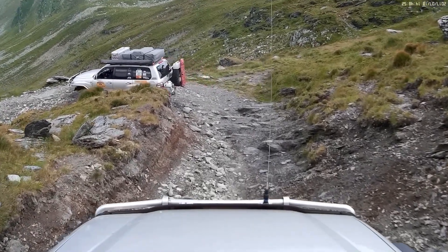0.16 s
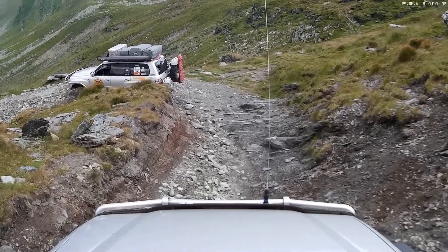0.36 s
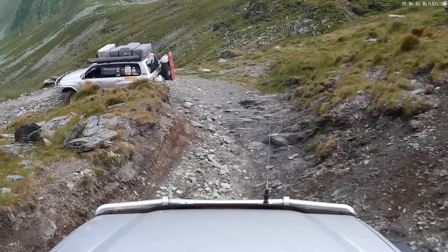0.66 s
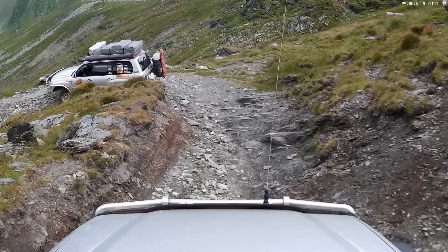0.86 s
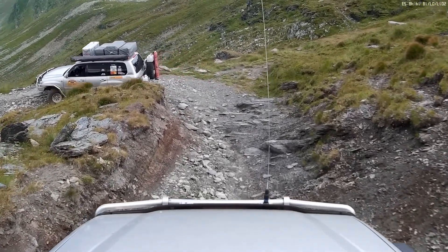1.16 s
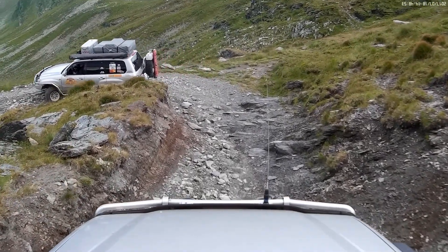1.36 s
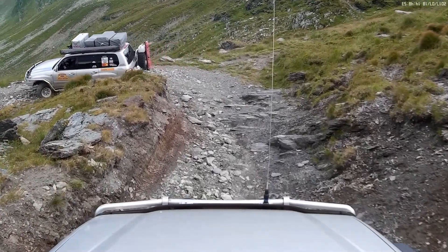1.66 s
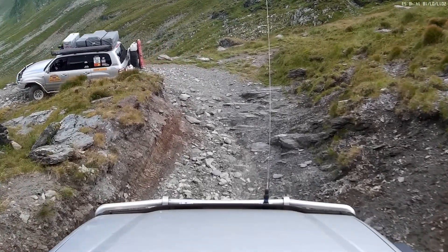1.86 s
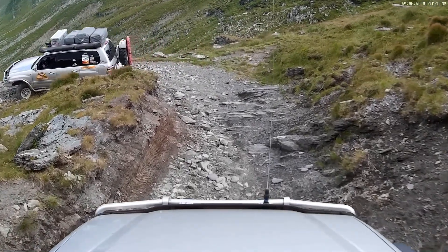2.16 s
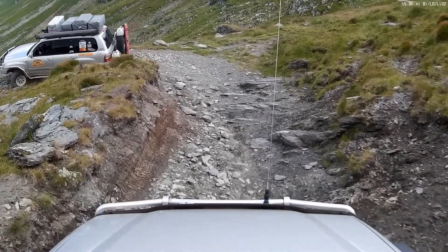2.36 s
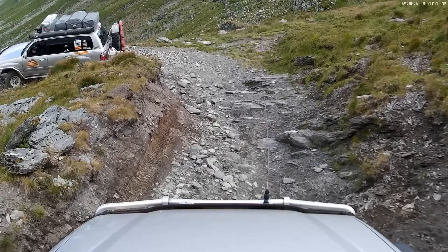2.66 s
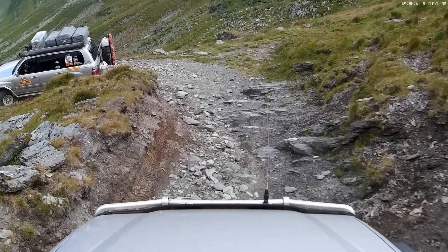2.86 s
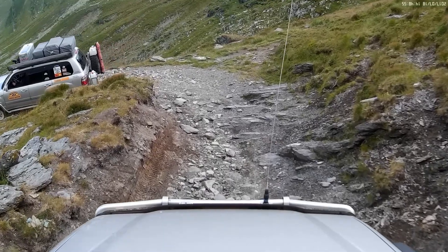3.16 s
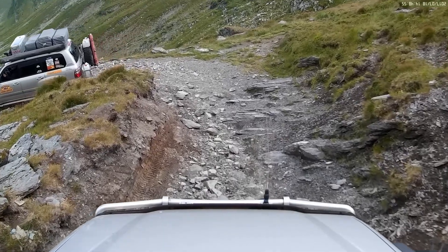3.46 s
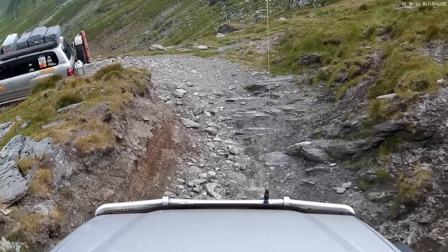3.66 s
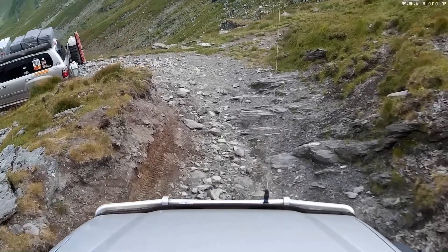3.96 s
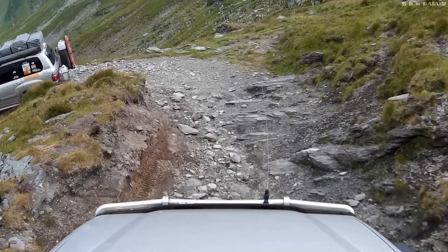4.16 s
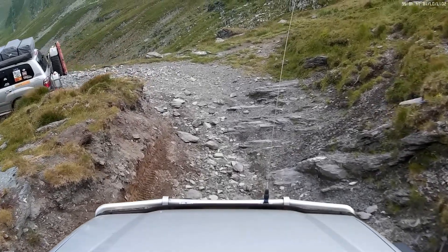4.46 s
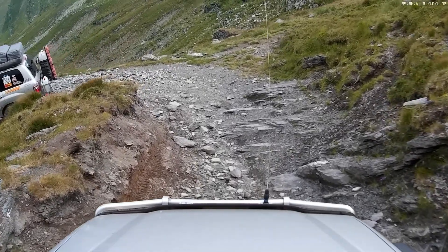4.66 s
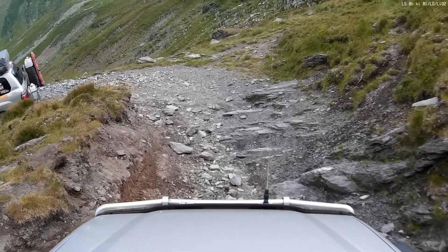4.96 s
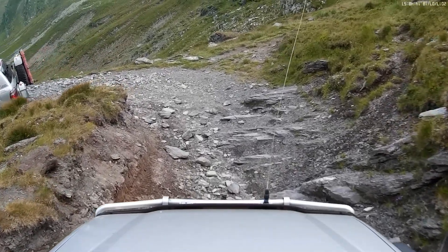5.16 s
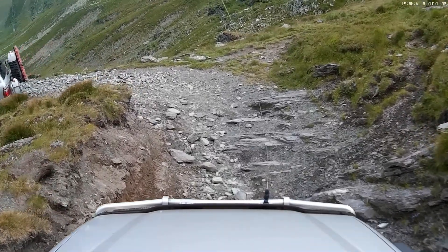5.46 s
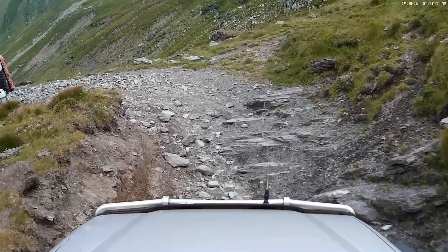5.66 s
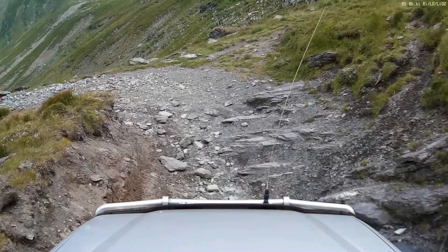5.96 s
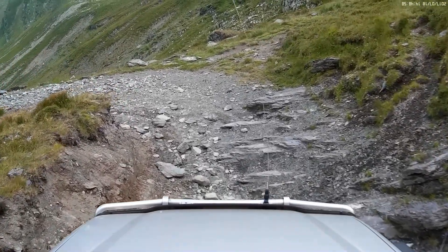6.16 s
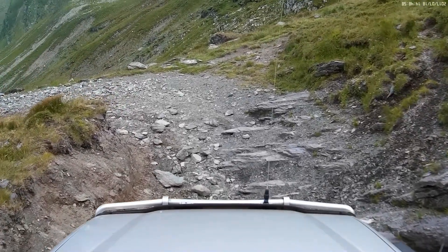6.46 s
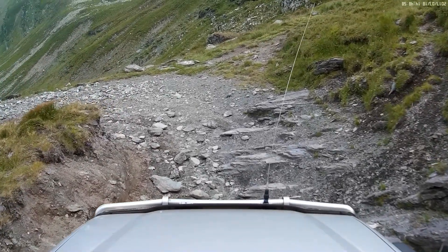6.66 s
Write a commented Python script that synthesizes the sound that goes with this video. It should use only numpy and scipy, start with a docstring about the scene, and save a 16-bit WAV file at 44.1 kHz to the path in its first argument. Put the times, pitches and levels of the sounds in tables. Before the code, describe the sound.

A low engine hum and stony tyre rumble inside a slowly crawling off-road vehicle, loose fittings clacking, with one hard bang and scrape midway.

```python
"""A low engine hum, tyre rumble and clacking cabin fittings: a four-wheel drive crawls over a rocky track,
heard from behind its windscreen. Engine orders make the hum; shaped noise and small knocks make the stony track.
Rocks thud as damped sines; fittings clack as noise bursts through resonances. One big lurch bangs a fitting
and grinds on stone. Trim squeaks as short rough tones of unsteady pitch, a brake sings thinly, high hiss
swishes by, and the camera's lens motor whines faintly as a train of filtered ticks over a steady hiss."""
import sys
import numpy as np
from scipy import signal
from scipy.fft import rfft, irfft, next_fast_len
from scipy.io import wavfile
from scipy.ndimage import map_coordinates

SR = 44100
rng = np.random.default_rng(int(sys.argv[2]) if len(sys.argv) > 2 else 0)


def master_out(mix):
    """Clip the mix to full scale and print it as 16-bit PCM to the path in sys.argv[1]."""
    frames = np.transpose(np.atleast_2d(mix))
    ceiling = np.clip(frames, -1, 1)
    pcm = np.round(ceiling * 32767).astype(np.int16)
    wavfile.write(sys.argv[1], SR, pcm)


N = 299880  # length in samples


def amp(db):
    """Decibels to gain."""
    return 10 ** (np.asarray(db) / 20)


def unit(x):
    """Scale to rms 1."""
    return x / np.sqrt(np.mean(x ** 2) + 1e-20)


def curves(rows):
    """One value per sample for each column after the time."""
    s, *columns = np.transpose(rows)
    return [np.interp(np.arange(N) / SR, s, column) for column in columns]


def wobble(rate, size=N):
    """A smooth random curve, rate knots a second."""
    knots = rng.standard_normal(size // 32)
    return map_coordinates(knots, [np.arange(size) * rate / SR], mode="wrap")


def add(track, s, sound):
    """Mix a sound into a track at time s."""
    part = track[max(round(s * SR), 0):][:len(sound)]
    part += sound[:len(part)]


def filtered(x, response):
    """Filter x by a complex response of frequency."""
    m = 2 * next_fast_len(N // 2 + SR // 4)
    return irfft(rfft(x, m) * response(np.fft.rfftfreq(m, 1 / SR)), m)[:N]


def coloured(x, points):
    """Causal filter of unit power gain through (f/Hz, level/dB) points."""
    def response(hz):
        f, db = np.transpose(points)
        gain = unit(amp(np.interp(np.log(hz + 1), np.log(f), db)))
        # folding the cepstrum forward gives minimum phase: nothing sounds before the input
        cepstrum = irfft(np.log(gain))
        cepstrum[1:len(hz) - 1] *= 2
        cepstrum[len(hz):] = 0
        return np.exp(rfft(cepstrum))
    return filtered(x, response)


def resonate(x, modes):
    """Causal bank of resonances of unit power gain, each falling off steeply above its pitch."""
    def response(f):
        h = 0
        for c, width, db in modes:
            band = 1j * f * width / (c * c - f * f + 1j * f * width)
            h = h + amp(db) * band / (1 + 1j * f / c) ** 2
        return h / np.sqrt(np.mean(abs(h) ** 2))
    return filtered(x, response)


def noise(points):
    """Coloured noise of rms 1."""
    return unit(coloured(rng.standard_normal(N), points))


def burst(attack, t60):
    """A scatter of cabin reflections that builds up and dies away."""
    t = np.arange(SR // 5) / SR
    decay = np.exp(-np.log(1000) * t / t60)
    return rng.standard_normal(len(t)) * (1 - np.exp(-t / attack)) * decay


# relative spectrum of the cabin hiss: f/Hz, level/dB
AIR_COLOUR = [(1900, -10), (3300, 4.5), (3800, -6), (5050, -0.5), (5800, -9), (10200, -14), (15500, -28)]


def air():
    """A faint, steady hiss fills the cabin."""
    drift_db = 1.2 * wobble(6)
    return noise(AIR_COLOUR) * amp(-63.0 + drift_db)


# short runs of the lens motor: t/s, length/s, step rate f/Hz, level/dB
LENS_RUNS = [(0.25, 0.23, 1411.5, -68), (3.49, 0.04, 790, -61), (4.29, 0.12, 1411.5, -73),
             (5.45, 0.6, 170, -72), (6.41, 0.08, 1411.5, -73), (6.49, 0.042, 790, -65)]
# how the lens barrel passes the steps on: f/Hz, relative level/dB
LENS_BARREL = [(5000, -26), (8600, -9), (10100, 2), (11200, -2), (12900, -12), (14150, -6), (15000, -26)]
HUNT_HZ = 140  # at or below this step rate the motor stumbles most


def lens_motor():
    """Each motor step ticks the lens barrel: slow runs stumble and rustle, fast ones whine thinly."""
    out = np.zeros(N)
    barrel = coloured(signal.unit_impulse(N), LENS_BARREL)[:SR // 100]
    for s, length, hz, db in LENS_RUNS:
        stumble = min(HUNT_HZ / hz, 1) ** 3 * wobble(300, size=SR)[:int(length * SR)]
        rate = hz * np.exp(stumble)
        steps = np.cumsum(rate) / SR
        offset = (steps % 1 - .5) * SR / rate  # samples from the nearest step
        size = amp(2.5 * rng.standard_normal(SR))[steps.astype(int)]
        impulses = size * np.sinc(offset) * np.sin(np.pi * steps) ** 2
        ticks = signal.fftconvolve(impulses, barrel)[:len(steps)]
        add(out, s, amp(db) * unit(ticks) * signal.windows.tukey(len(steps), .2))
    return out


# a faint high rub comes round about once a turn of the wheels: start t/s
SWISH_STARTS = [1.26, 2.24, 3.26, 4.39, 5.27, 6.25]
SWISH_S = 0.28  # length of one rub


def swishes():
    """Soft, slightly grainy swells of narrow high hiss."""
    swell = np.zeros(N)
    for s in SWISH_STARTS:
        add(swell, s, signal.windows.tukey(int(SWISH_S * SR), .5))
    hiss = noise([(9100, -17), (10100, -8), (11200, -23)])
    return amp(-66.0 + 1.59 * wobble(60)) * swell * hiss


# path of a faint brake squeal, before its flutter: t/s, f/Hz, level/dB
BRAKE_SQUEAL = [(4.48, 6060, -71), (4.56, 6095, -54), (4.72, 6130, -64), (4.98, 5990, -60),
                (5.05, 6020, -73)]


def brake():
    """A rubbing brake sings one thin tone for a moment, its pitch and level fluttering."""
    hz, db = curves(BRAKE_SQUEAL)
    t = np.arange(N) / SR
    rubbing = (t > BRAKE_SQUEAL[0][0]) & (t < BRAKE_SQUEAL[-1][0])
    phase = 2 * np.pi * np.cumsum(hz * (1 + 0.003 * wobble(300))) / SR
    flutter_db = 2 * wobble(35) + 2.5 * wobble(150)
    return rubbing * amp(db + flutter_db) * np.sin(phase)


# stick-slip chirps of rubbing trim: t/s, length/s, centre f/Hz, level/dB
TRIM_SQUEAKS = [(0.318, 0.13, 3414, -46.5), (2.863, 0.039, 3420, -36.5), (2.913, 0.023, 7600, -44),
                (2.936, 0.022, 3470, -38), (2.962, 0.019, 7600, -46), (2.966, 0.0248, 3480, -40),
                (3.086, 0.03, 3280, -42.5), (3.122, 0.064, 6150, -63)]
SQUEAK_ROUGH_S = 0.035


def squeaks():
    """Rubbing trim catches and slips: squeaks up to SQUEAK_ROUGH_S rasp most, longer ones are steadier."""
    out = np.zeros(N)
    for s, length, hz, db in TRIM_SQUEAKS:
        n = int(length * SR)
        rough = min(SQUEAK_ROUGH_S / length, 1) ** 2
        pitch = hz + 130 * rough * wobble(900, size=SR)[:n]
        grip = amp(6 * rough * wobble(420, size=SR)[:n])
        tone = unit(grip * np.sin(2 * np.pi * np.cumsum(pitch) / SR))
        add(out, s, amp(db) * signal.windows.tukey(n, .5) * tone)
    return out


# how hard the tyres work over the stones: t/s, effort level/dB
TYRE_EFFORT = [(0, 0.5), (0.47, 6), (1, 1), (2.5, 0.5), (3.05, 4.5), (3.7, 0.5), (6.8, 1)]


def effort():
    """Effort of the tyres in dB; it lifts the rumble, the tyre noise and the engine's whirr."""
    return curves(TYRE_EFFORT)[0]


# engine speed before its small wander: t/s, firing rate f/Hz
FIRING_RATE = [(0, 31.17), (0.65, 32.45), (1.1, 31.24), (2.2, 35.14), (3.3, 33.58), (4.8, 34.9),
               (5.4, 33.02), (6.8, 33.75)]
# the cabin booms when the engine labours and drones when it runs freer:
# f/Hz of an engine order, its level/dB before the slow fade and waver
CABIN_BOOM = [(31, -44), (35, -63.5), (63, -48.5), (70, -58.5), (94, -55.5), (106, -67), (128, -62),
              (139, -52), (160, -55.5)]
# relative spectrum of the engine's whirr: f/Hz, level/dB
WHIRR_COLOUR = [(850, -18), (1100, -6), (1250, 3.5), (1430, -5), (1820, -6.5), (2200, -23.5), (5000, -40.5)]
HUM_FADE_DB_PER_S = 0.74  # the hum eases along the track
WHIRR_DB, WHIRR_GROWS = -50.5, 1.43  # level at an effort of 0 dB; dB per dB of effort


def engine():
    """Each firing of the slow-running engine sends a low pulse through the cabin and makes its whirr throb."""
    hz, = curves(FIRING_RATE)
    phase = 2 * np.pi * np.cumsum(hz * (1 + 0.0055 * wobble(18))) / SR
    fade_db = HUM_FADE_DB_PER_S * np.arange(N) / SR
    hum = np.zeros(N)
    for order in range(1, 6):
        db = np.interp(order * hz, *np.transpose(CABIN_BOOM)) - fade_db
        waver = amp(2 * wobble(8))
        hum += np.sqrt(2) * amp(db) * waver * np.cos(order * phase)
    throb = 1 + 0.38 * np.sin(phase)
    whirr_db = WHIRR_DB + WHIRR_GROWS * effort() + 1.64 * wobble(21)
    return hum + noise(WHIRR_COLOUR) * throb * amp(whirr_db)


# the vehicle drops off one big rock: the lurch builds up, peaks and settles
LURCH_S, LURCH_RISE_S, LURCH_FALL_S = 2.874, 0.34, 0.15


def lurch():
    """Depth of the big lurch, 0 to 1."""
    return curves([(LURCH_S - LURCH_RISE_S, 0), (LURCH_S, 1), (LURCH_S + LURCH_FALL_S, 0)])[0]


# relative spectrum of the body's rumble: f/Hz, level/dB
RUMBLE_COLOUR = [(15, -3), (25, 4.5), (35, 5.5), (65, -7.5), (100, 1), (150, -19), (300, -83)]
# relative spectrum of the tyres on loose stones: f/Hz, level/dB
TYRE_COLOUR = [(60, -28), (130, 1), (270, 2), (480, 0), (680, -11), (1000, -4.5), (2000, -49)]
RUMBLE_DB, TYRE_DB = -50, -49  # at an effort of 0 dB, away from the lurch
RUMBLE_GROWS = 0.82  # dB per dB of effort
LURCH_RUMBLE_DB, LURCH_TYRE_DB = 19, 12.5  # added at the lurch's peak


def track():
    """The body sways and rumbles while the tyres grind over loose stones: two bands of shaped noise."""
    effort_db, depth = effort(), lurch()
    rumble_db = RUMBLE_DB + RUMBLE_GROWS * effort_db + LURCH_RUMBLE_DB * depth
    tyre_db = TYRE_DB + effort_db + LURCH_TYRE_DB * depth + 1.03 * wobble(30)
    return noise(RUMBLE_COLOUR) * amp(rumble_db) + noise(TYRE_COLOUR) * amp(tyre_db)


# typical level at an effort of 0 dB, typical pitch, decay time
PEBBLES_PER_S, PEBBLE_DB, PEBBLE_HZ, PEBBLE_T60_S = 26, -44, 499, 0.031


def pebbles():
    """Small stones knock dully under the tyres as damped sines, harder where the tyres work harder."""
    t = np.arange(SR // 16) / SR
    out = np.zeros(N)
    draws = rng.standard_normal((int(PEBBLES_PER_S * N / SR), 3))
    for k, (when, size, pitch) in enumerate(draws):
        s = (k + when) / PEBBLES_PER_S
        db = PEBBLE_DB + np.interp(s, *np.transpose(TYRE_EFFORT)) + 4.5 * min(size, 2)
        hz = PEBBLE_HZ * np.exp(0.45 * pitch)
        swell = (1 - np.exp(-t / 0.0011)) * amp(db - 60 * t / PEBBLE_T60_S)
        add(out, s, swell * np.sin(2 * np.pi * hz * t))
    return out


# relative spectrum of stone scraping: f/Hz, level/dB
GRIND_COLOUR = [(300, 4), (1000, -9), (1750, 4.5), (2400, -8), (3450, 6), (5800, -31), (7200, -11),
                (8800, -25), (15500, -34)]
GRIND_DB, GRIND_HOLD_S, GRIND_FALL_DB_PER_S, GRITS_PER_S = -34.5, 0.024, 67, 260


def grind():
    """From the lurch's peak on, stone scrapes in a dense run of gritty catches that dies away."""
    t = np.arange(N) / SR - LURCH_S
    grits = (rng.random(N) < GRITS_PER_S / SR) * rng.standard_normal(N)
    scattered = signal.fftconvolve(grits, burst(attack=0.00071, t60=0.073))[:N]
    crunch = unit(coloured(scattered, GRIND_COLOUR))
    fall_db = GRIND_FALL_DB_PER_S * np.maximum(t - GRIND_HOLD_S, 0)
    return (t > 0) * crunch * amp(GRIND_DB + 3 * wobble(70) - fall_db)


# rocks under the floor: t/s, strength as a level/dB, f/Hz
ROCK_THUDS = [(0.476, -24, 238), (0.528, -15.5, 304), (1.103, -15.5, 235), (1.463, -25.5, 550),
              (2.122, -26, 473), (2.717, -24, 262), (3.166, -12.5, 298), (4.062, -23.5, 400),
              (4.16, -23.5, 520), (4.31, -22.5, 577)]
THUD_ATTACK_S, THUD_T60_S, PUSH_DB = 0.0021, 0.02, 5  # the floor is heavily damped


def thuds():
    """A rock gives the floor one short round push, and the panels shudder after it."""
    t = np.arange(SR // 6) / SR
    swell = (1 - np.exp(-t / THUD_ATTACK_S)) * amp(-60 * t / THUD_T60_S)
    push, shudder = np.zeros((2, N))
    for s, db, hz in ROCK_THUDS:
        give_db = PUSH_DB + 0.53 * (db + 16)  # the floor gives more under a heavy blow
        add(push, s, amp(db + give_db) * np.sin(2 * np.pi * hz * t) * swell)
        add(shudder, s, amp(db - 7) * burst(attack=0.003, t60=0.093))
    return push + coloured(shudder, [(70, -5.5), (200, -2.5), (450, 0), (800, -13.5), (3500, -52)])


MODE_SPREAD = 0.006  # the fittings ring a little higher or lower at each contact


def detuned(ring):
    """The same ring, shifted slightly in pitch by chance."""
    n = np.arange(len(ring))
    return map_coordinates(ring, [n * (1 + MODE_SPREAD * rng.standard_normal())])


# loose fittings strike and fall back, mostly in pairs: t/s, click level/dB, ring level/dB
FITTING_CLACKS = [(0.048, -54, -40), (0.076, -51, -42.5), (0.163, -52, -41.5), (0.226, -54.5, -41),
                  (0.257, -39.5, -29), (0.322, -40.5, -31), (0.462, -49.5, -39), (0.505, -51.5, -40),
                  (0.603, -41, -30.5), (0.65, -45, -33), (0.812, -54.5, -44), (1.051, -56.5, -46.5),
                  (1.134, -50, -40.5), (1.201, -51.5, -40), (1.235, -42.5, -31), (1.494, -59, -44.5),
                  (1.631, -50.5, -40), (1.814, -54, -40.5), (1.871, -56.5, -45.5), (1.942, -57, -48),
                  (2.308, -54.5, -44.5), (2.469, -48, -37.5), (2.573, -47, -34.5), (2.65, -47.5, -36.5),
                  (2.751, -44, -31.5), (2.777, -43.5, -26.5), (2.807, -33, -21), (2.894, -43, -30),
                  (2.975, -46.5, -29.5), (3.034, -45, -32.5), (3.114, -49.5, -34.5), (3.188, -41, -35),
                  (3.244, -41.5, -30.5), (3.349, -43, -29.5), (3.468, -43.5, -33), (3.498, -47.5, -36),
                  (3.686, -54.5, -44.5), (3.946, -50.5, -37.5), (4.076, -51, -41), (4.273, -49, -38),
                  (4.325, -49, -40.5), (4.639, -51, -41.5), (4.681, -55.5, -44), (4.784, -53.5, -41.5),
                  (4.83, -48.5, -36), (4.858, -48, -35.5), (4.885, -49, -35.5), (4.948, -51, -40.5),
                  (4.983, -56, -42), (5.209, -51, -39), (5.265, -52.5, -41.5), (5.306, -50.5, -40),
                  (5.427, -44.5, -34), (5.769, -55, -42.5), (5.83, -54, -42.5), (5.907, -51, -38),
                  (5.929, -47, -36.5), (5.96, -45.5, -37.5), (6.264, -50.5, -38.5), (6.338, -49, -39),
                  (6.413, -54, -41)]
# resonances in the hollow ring: f/Hz, width/Hz, relative level/dB
RING_MODES = [(433.2, 8, 12), (1026, 4.3, 13), (1273, 4.2, 15), (1389, 18, 9.5), (1548, 8.5, 12),
              (1647, 7.1, 16.5), (1746.6, 11.8, 15), (1757, 10.4, 16.5), (1920, 7.8, 6)]
# resonances in the bright click: f/Hz, width/Hz, relative level/dB
CLICK_MODES = [(3014, 24, 7), (3373, 17, 6.5), (4023, 33, 4.2), (4900, 35, 3.8)]
# relative spectrum of the hollow ring's noise: f/Hz, level/dB
RING_COLOUR = [(80, -23), (200, -11), (480, -3.5), (700, -11.5), (950, -7), (1480, -7), (1720, 1),
               (1930, 1.5), (2250, -32), (4000, -57.5)]
# relative spectrum of the bright click's noise: f/Hz, level/dB
CLICK_COLOUR = [(1900, -34.5), (2350, 4.5), (3400, 8.5), (3750, -1), (4900, 3.5), (5700, -8), (6900, -9.5),
                (7700, -2.5), (8600, -15), (9700, -9.5), (15500, -31)]
CHATTER_DB, CHATTER_PER_S = 3, 258  # a contact chatters: its click breaks up into fine ticks


def fittings():
    """Each contact gives a bright click and a hollow ring; their balance and colour differ from blow to blow."""
    impulse = signal.unit_impulse(N)
    click_body = coloured(impulse, CLICK_COLOUR)[:SR // 4]
    click_modes = resonate(impulse, CLICK_MODES)[:SR // 4]
    ring_body = coloured(impulse, RING_COLOUR)[:SR // 4]
    ring_modes = resonate(impulse, RING_MODES)[:SR // 4]

    def at_level(x, db):
        """Set the rms of the first 40 ms."""
        return amp(db) * x / np.sqrt(np.mean(x[:SR // 25] ** 2))

    cabin = burst(attack=0.0019, t60=0.23)  # the same reflections follow every contact
    out = np.zeros(N)
    for s, click_db, ring_db in FITTING_CLACKS:
        snap = burst(attack=0.00021, t60=0.045)
        snap = snap + amp(-7.5) * burst(attack=0.0017, t60=0.31) + amp(-7.5) * cabin
        chatter = amp(CHATTER_DB * wobble(CHATTER_PER_S, size=len(snap)))
        click = signal.fftconvolve(snap * chatter, click_body)
        click += signal.fftconvolve(amp(-5.0) * burst(attack=0.0001, t60=0.2), detuned(click_modes))
        ring = signal.fftconvolve(amp(-6.0) * burst(attack=0.0084, t60=0.24), ring_body)
        ring += signal.fftconvolve(burst(attack=0.0021, t60=0.074), detuned(ring_modes))
        add(out, s, at_level(click, click_db) + at_level(ring, ring_db))
    return out


# hard blows of the big jolt: t/s, strength as a level/dB, f/Hz
SLAM_BLOWS = [(2.8061, -3, 1676), (2.8169, -10, 1580), (2.822, -5, 1747), (2.849, -13, 1770)]


def slam():
    """The big jolt bangs a fitting hard several times; each blow rings briefly and cracks."""
    t = np.arange(SR // 8) / SR
    swell = (1 - np.exp(-t / 0.0011)) * amp(-60 * t / 0.027)
    ring, crack = np.zeros((2, N))
    for s, db, hz in SLAM_BLOWS:
        add(ring, s, amp(db) * np.sin(2 * np.pi * hz * t) * swell)
        add(crack, s, amp(db - 18.0) * burst(attack=0.00046, t60=0.068))
    crack_colour = [(100, -7), (800, -11), (1600, 9.0), (2300, -15), (3000, 7.5), (5000, -6), (6200, -41)]
    return ring + coloured(crack, crack_colour)


def scene():
    """Everything meets at one microphone in the cabin."""
    background = air() + lens_motor() + swishes() + brake() + squeaks()
    driving = engine() + track() + pebbles() + grind()
    blows = thuds() + fittings() + slam()
    return (background + driving + blows)[None]


TOP_HZ = 15720  # band limit of the camera


def record(dry):
    """The camera keeps nothing above its band limit."""
    return filtered(dry[0], lambda hz: hz < TOP_HZ)[None]


dry = scene()
out = record(dry)
master_out(out)
```